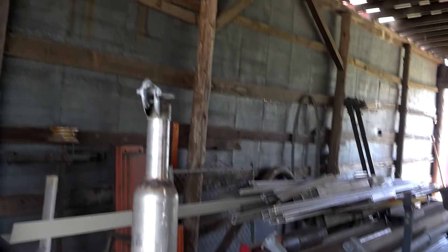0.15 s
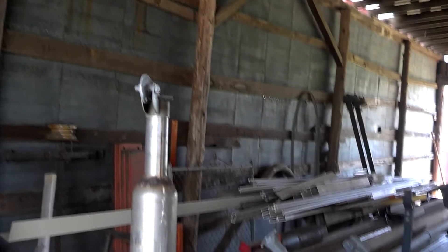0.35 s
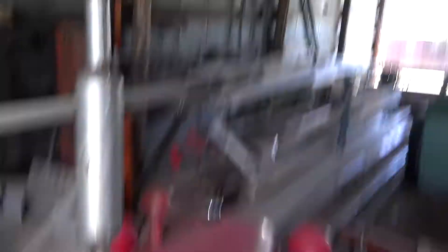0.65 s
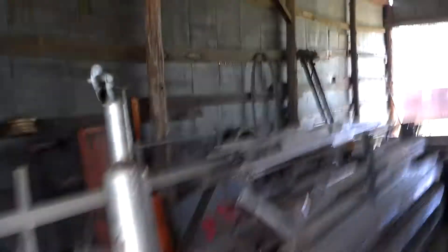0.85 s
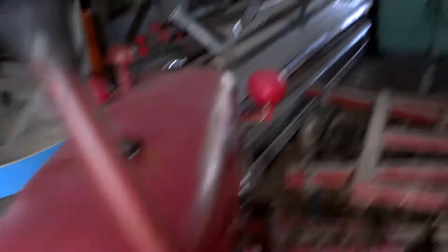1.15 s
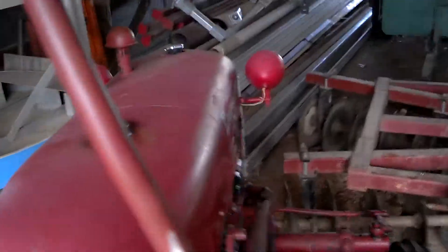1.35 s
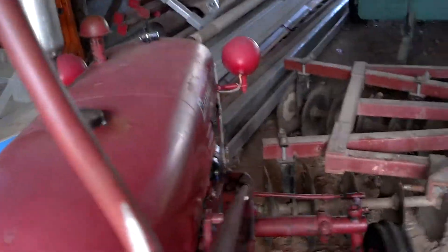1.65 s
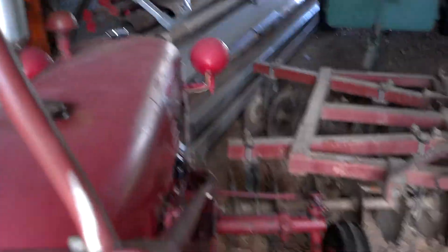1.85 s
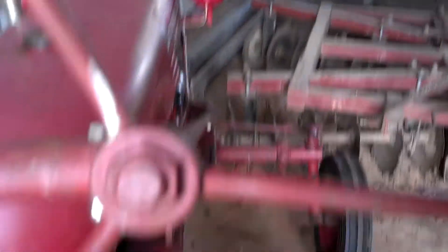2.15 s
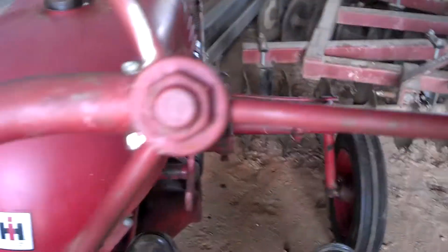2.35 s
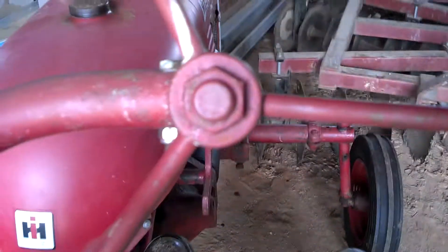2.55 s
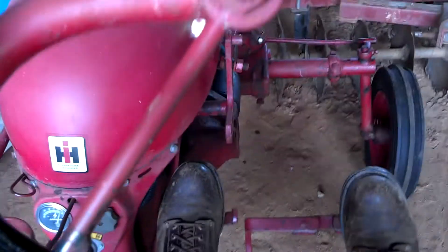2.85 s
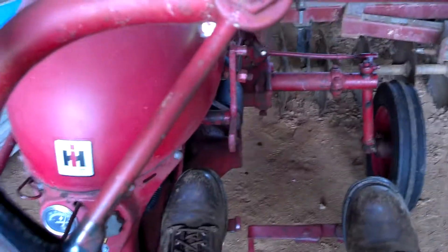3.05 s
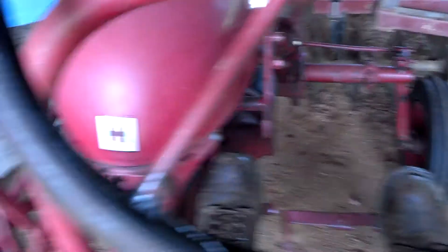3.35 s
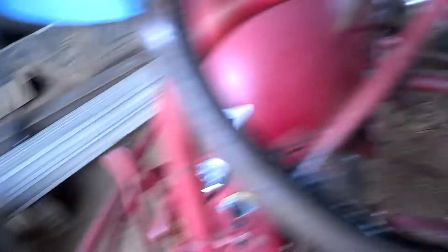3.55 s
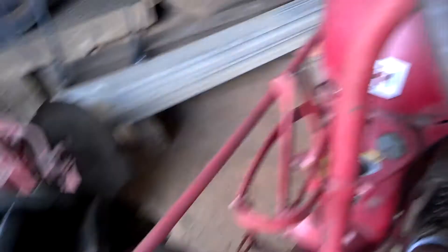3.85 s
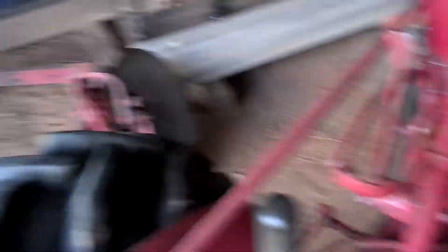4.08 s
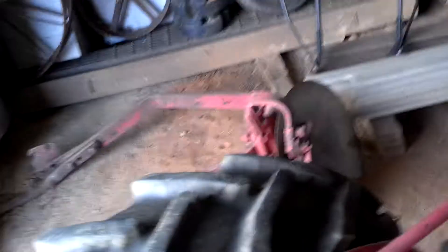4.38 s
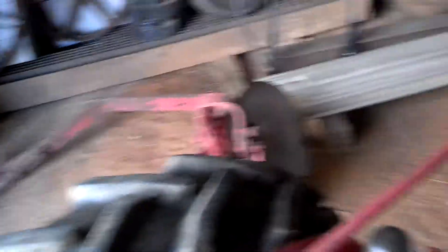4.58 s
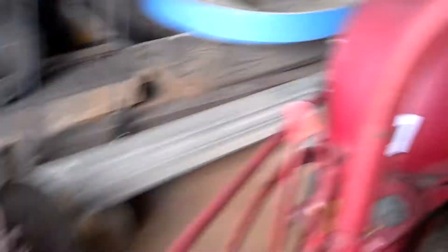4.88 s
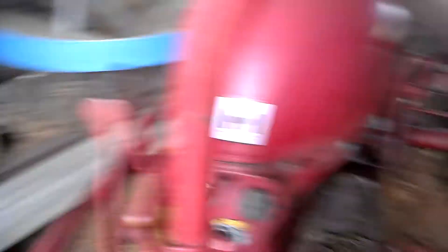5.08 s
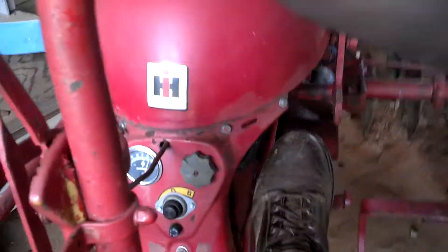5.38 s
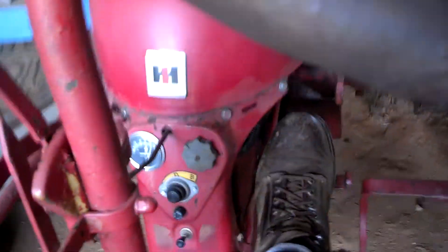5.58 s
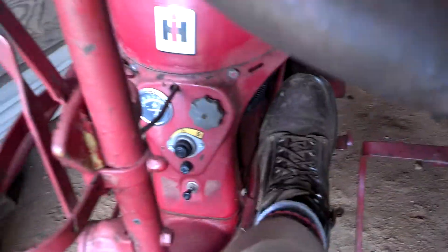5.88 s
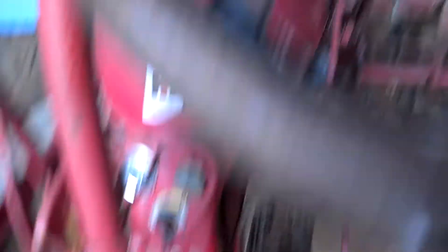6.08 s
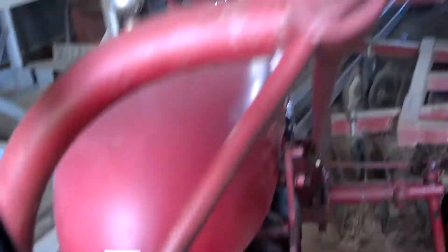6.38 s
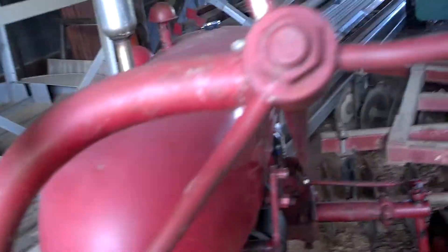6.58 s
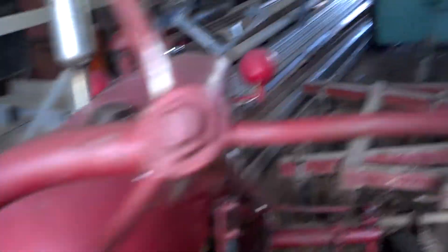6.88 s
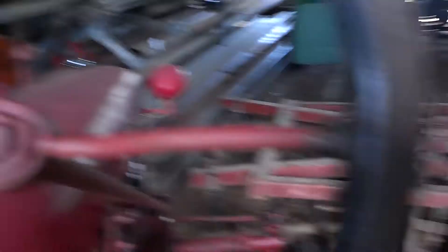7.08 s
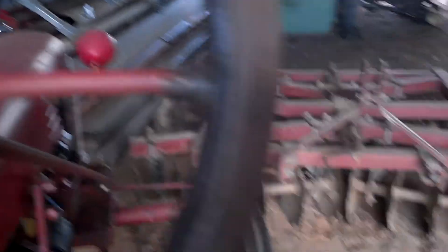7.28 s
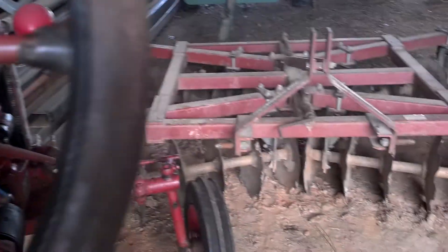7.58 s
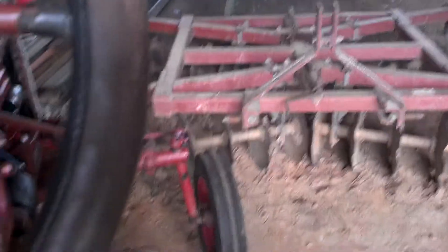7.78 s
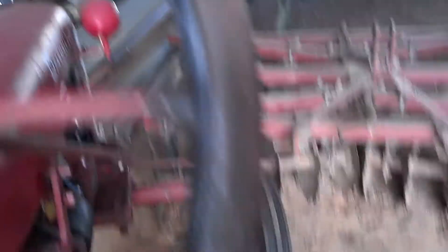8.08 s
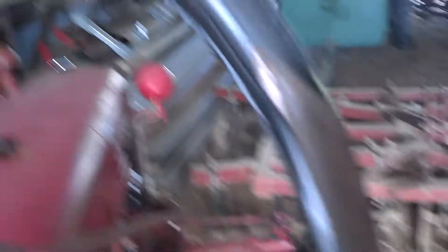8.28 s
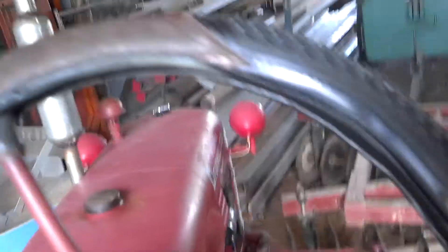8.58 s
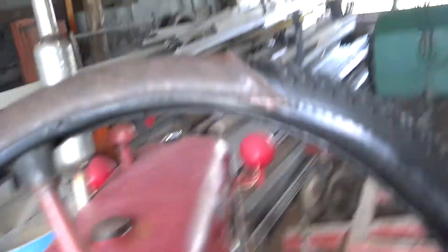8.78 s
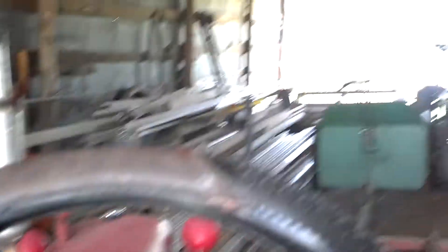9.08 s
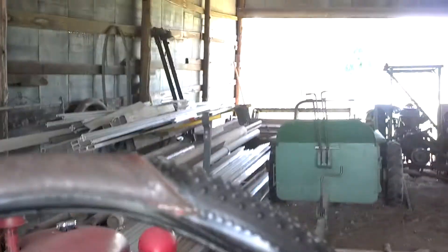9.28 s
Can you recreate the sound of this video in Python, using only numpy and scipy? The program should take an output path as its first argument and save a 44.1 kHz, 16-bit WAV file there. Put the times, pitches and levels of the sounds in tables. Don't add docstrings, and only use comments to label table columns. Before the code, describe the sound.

A steady, rough engine drone with rapid firing pulses, rhythmic valve clatter and faint belt squeaks. At first it is muffled by a hand, with buzzing plastic and several thuds, then it opens up brighter. Light metallic tinkles from the exhaust cap continue. One sharp knock just before five seconds ducks the sound, which creeps back. The tone shifts as the camera turns inside the shed.

```python
import sys
import numpy as np
from scipy import signal
from scipy.fft import rfft, irfft
from scipy.io import wavfile
from scipy.ndimage import uniform_filter1d, map_coordinates

SR = 44100
rng = np.random.default_rng(int(sys.argv[2]) if len(sys.argv) > 2 else 0)


def nominal_scale(level):
    x = np.asarray(level, float) / 20
    return 10 ** x


def master(y):
    cut = np.clip(np.atleast_2d(y).T, -1, 1)
    pcm = np.round(cut * 32767)
    wavfile.write(sys.argv[1], SR, pcm.astype(np.int16))


N = 416304
TIME, HZ = np.arange(N) / SR, np.fft.rfftfreq(N, 1 / SR) + 1e-3

# (time [s], four times the firing rate [Hz])
ENGINE_SPEED = [
    (.3, 110.1),
    (.9, 109.2),
    (2.1, 109.4),
    (3.8, 110.1),
    (4.45, 110.7),
    (5.7, 111.0),
    (9.44, 111.05),
]


def level(x, db):
    return x * nominal_scale(db) / np.sqrt(np.mean(x ** 2))


def along(table, column):
    table = np.array(table, float)
    return np.interp(np.log(HZ), np.log(table[:, 0]), table[:, column])


def ring(x, hz, width_hz):
    r, w = np.exp(-np.pi * width_hz / SR), 2 * np.pi * hz / SR
    return signal.lfilter([0, r * np.sin(w)], [1, -2 * r * np.cos(w), r * r], x)


def band(x, edges_hz):
    return signal.lfilter(*signal.butter(1, edges_hz, "band", fs=SR), x)


def blows(at, size):
    return np.bincount(np.clip(at.astype(int), 0, N - 1), size, N)


def walk(rate):
    k = int(SR / rate)
    steps = np.repeat(rng.standard_normal(N // k + 1), k)
    return 1.37 * uniform_filter1d(uniform_filter1d(steps, k), k)[:N]


def gain_control():
    # (time [s], depth [dB])
    ducks = [
        (0, 0.5),
        (0.271, 2),
        (0.505, 3),
        (.584, 4.5),
        (.858, 0),
        (1.081, 9),
        (4.784, 13.5),
    ]
    hold_s, recover_db_per_s = .11, 10.5
    s, depth_db = np.transpose(ducks)[:, :, None]
    recovered_db = recover_db_per_s * np.clip(TIME - s - hold_s, 0, None)
    return -np.max((TIME >= s) * np.clip(depth_db - recovered_db, 0, None), axis=0)


def roar(fired, treble_db, puff=1.8, fade=.35, flicker_db=1.2, split_hz=5000):
    # (frequency [Hz], level per Hz [dB])
    colour = [(50, -51), (72, -5), (110, -10), (200, -4.5), (400, -8), (650, -6), (1150, -6.5),
              (1600, -16.5), (2000, -14), (3000, -24), (5000, -28.5), (9500, -41.5), (11300, -43),
              (11800, -32), (15500, -29)]
    cylinder_db = [-8, -8, -12, -14]
    strength = nominal_scale(np.take(cylinder_db, fired.astype(int) % 4))
    gate = 1 + puff * strength * np.exp(-((fired + .8) % 1) / fade)
    gas = level(gate * nominal_scale(flicker_db * walk(14)), 0) * rng.standard_normal(N)
    hiss = nominal_scale(treble_db + .56 * walk(9.1) + .5 * walk(4.2)) * rng.standard_normal(N)
    low = 1 / (1 + (HZ / split_hz) ** 2)
    mixed = rfft(gas) * np.sqrt(low) + rfft(hiss) * np.sqrt(1 - low)
    return irfft(mixed * nominal_scale(along(colour, 1)), N)


def belt(fired, slip_db=4, slips=30, swell_db=1.2, tug_db=7, tug_at=.6, tug_firings=.6):
    # (frequency [Hz], width [Hz], level [dB])
    squeaks = [(3204, 70, 3.5), (3546, 140, 1.5), (3767, 70, 1.5), (4456, 190, 0.5), (3900, 1500, -7.5)]
    cycle = (fired - tug_at) / 4
    strength_db = tug_db * rng.random(N // 4000)[cycle.astype(int) + 1]
    tug = strength_db * 2 * np.exp(-(cycle % 1) * 4 / tug_firings)
    swell = swell_db * walk(3.8) + uniform_filter1d(tug, size=300)
    out = 0
    for hz, width, db in squeaks:
        slipping = nominal_scale(slip_db * walk(slips) + swell) * rng.standard_normal(N)
        out = out + level(ring(slipping, hz, width), db)
    return out


def rain_cap(duck_db, chatter_db=-56, hold_s=.07, share_db=2.5, rough_db=1.2):
    # (frequency [Hz], width [Hz], level [dB])
    lid = [(3690, 40, -7), (4522, 25, 0), (5250, 30, -14), (5510, 25, -14), (5770, 40, -17), (6655, 30, -8),
           (6740, 40, -10), (7750, 30, -20)]
    # (time [s], peak level [dB], level of tones above 6 kHz [dB])
    strikes = [(.003, -36, -20), (0.421, -34, -30), (0.6618, -36, -14), (1.06, -37, -10), (1.839, -37, -19),
               (1.9527, -37, -8), (2.035, -35, 1.5), (2.133, -39, -12), (2.255, -37, -12), (2.458, -36, -7),
               (2.665, -36, 0), (2.9747, -41, -16), (3.242, -38, -6), (3.431, -33, -24), (3.622, -40, -6),
               (3.813, -40, -3), (3.95, -44, -15), (4.13, -38, -11), (4.7142, -43, 1), (4.87, -50, -13),
               (5.2692, -46, -20), (5.69, -44, -13), (5.886, -35.5, -6), (6.29, -40, -13),
               (6.4695, -36, -10), (6.671, -40, -10), (6.9044, -43, 3), (7.0, -40, -18),
               (7.086, -29.5, -13), (7.266, -34, -11), (7.4964, -37, -17), (7.575, -38, -21),
               (7.663, -36, -16), (7.867, -36, -8), (8.012, -47, -14), (8.1815, -50, -18),
               (8.411, -41, -15), (8.556, -47, -15), (8.73, -36, -7), (9.07, -36, -14), (9.226, -39, -17),
               (9.399, -36, -9)]
    s, peak_db, upper_db = np.transpose(strikes)
    luck = rng.standard_normal((len(s), len(lid)))
    held = uniform_filter1d(blows((s + hold_s / 2) * SR, np.ones(len(s))), int(hold_s * SR)) > 0
    held = np.roll(uniform_filter1d(1. * held, size=700), shift=300)
    out = 0
    for k, (hz, width, db) in enumerate(lid):
        extra_db = upper_db + 7.5 if hz > 6000 else share_db * luck[:, k] * (db < 0)
        size = nominal_scale(peak_db - 3 + db + extra_db)
        struck = ring(blows(s * SR, size), hz, width / 3) * held * nominal_scale(rough_db * walk(70))
        trembling = nominal_scale(9.1 * walk(22)) * rng.standard_normal(N)
        chatter = level(ring(trembling, hz, .45 * width), chatter_db + .5 * db)
        out = out + struck + nominal_scale(duck_db) * chatter
    return out


def buzz(fired, rate_hz=1500, cut_hz=170, driven_db=-6, wander=.003):
    # (frequency [Hz], width [Hz], level [dB])
    rattle = [(187, 11, -3), (248, 9.1, -2), (342, 12, -5), (442, 24, 5.5), (700, 30, 0.5), (912, 36, 5.5),
              (1040, 80, 4.5)]
    # (time [s], level [dB])
    pressed = [
        (0, -31),
        (.38, -29),
        (.42, -26.5),
        (.51, -35.5),
        (.58, -34),
    ]
    strikes = (rng.random(N) < rate_hz / SR) * rng.standard_normal(N) * nominal_scale(2 * rng.standard_normal(N))
    shake = (.39 + np.exp(-((fired + .031) % 1) / .45)) * strikes
    out = 0
    for hz, width, db in rattle:
        multiple = round(8 * hz / ENGINE_SPEED[0][1]) / 2
        turn = multiple * (fired + wander * walk(24)) + rng.random()
        driven = nominal_scale(db + driven_db + 2 * walk(12.3)) * np.sin(2 * np.pi * turn)
        out = out + nominal_scale(db) * level(ring(shake, hz, width), 0) + driven
    out = signal.lfilter(*signal.butter(2, cut_hz, "high", fs=SR), out)
    s, db = np.transpose(pressed)
    return out * nominal_scale(np.interp(TIME, s, db, right=-99) - 5.5)


def twist(shake, twist_db=6.5, twist_hz=(110, 271)):
    return nominal_scale(twist_db) * band(shake, twist_hz) * np.array([[-1.1], [.9]])


def fingers(push_s=(.0007, .0004, .00014, .00012), snap_db=-12):
    # (frequency [Hz], width [Hz])
    shell = [(430, 104), (1120, 570), (1800, 810), (4300, 480)]
    # (time [s], low tone [dB], high tone
    # [dB], nail tick [dB], low tone at left port against right [-2..1])
    knocks = [(.2928, -10, -1, -36, -0.9), (0.407, -10, -22, -38, .3), (0.4372, -5, -20, -40, .3),
              (0.4468, -8, -13, -38, .3), (0.4693, -8, 3, -24, -0.6), (0.5078, -1, 3.5, -22, -0.45),
              (0.5832, 1.5, -12, -40, -.1), (0.8576, -4, -20, -18, .3), (.8845, -2.5, -14, -44, -.3),
              (1.0171, -12, -26, -40, -.3), (1.0933, -27, -16, -30, -1), (4.747, -11, -3.5, -30, .3),
              (2.861, -32, -13, -34, .3), (3.411, -27, -15, -34, .3), (7.95, -24, -9, -30, .3)]
    # (time [s], frequency [Hz], width [Hz], left swing [-2..2], right swing [-2..2])
    hard_raps = [(.85785, 1000, 300, -.35, 0), (.8582, 1100, 300, 0, .14), (1.05735, 1300, 500, .8, 0),
                 (1.05775, 1350, 900, 0, -1), (1.0577, 2150, 600, -.3, -.3), (1.0582, 1050, 250, .22, .3),
                 (1.0589, 1080, 250, .25, .3), (1.0575, 520, 250, -.15, -.2), (1.0773, 1150, 500, 0, .5),
                 (1.0781, 700, 350, .9, 0), (1.0809, 450, 110, 0, .16), (4.7838, 900, 380, 0, -1.35),
                 (4.7842, 450, 200, .2, .3), (4.78395, 1750, 900, -.6, -.5), (4.78415, 1100, 550, .9, 0),
                 (4.784, 4300, 1100, -.3, -.3)]
    s, low_db, high_db, tick_db, left = np.transpose(knocks)

    def knock(size, k):
        push = uniform_filter1d(blows(s * SR, -size), int(push_s[k] * SR) + 1)
        return ring(push, *shell[k])

    sharp = knock(nominal_scale(high_db), 1) + knock(nominal_scale(tick_db), 2) + knock(nominal_scale(tick_db + snap_db), 3)
    left_port = knock(left * nominal_scale(low_db), 0) + .8 * np.roll(sharp, shift=3)
    right_port = knock(nominal_scale(low_db), 0) + sharp
    raps = 0
    for rap_s, hz, width, *swing in hard_raps:
        raps = raps + np.outer(swing, ring(blows(np.array([rap_s * SR]), [1.]), hz, width))
    raps = signal.lfilter(*signal.butter(1, 150, "high", fs=SR), raps)
    both = np.array([left_port, right_port])
    both = signal.lfilter(*signal.butter(2, [280, 5500], "band", fs=SR), both)
    return signal.lfilter(*signal.butter(4, 5300, fs=SR), both + raps)


def tappet(fired, cover_hz=1070, width_hz=30, scatter_db=1, blow_db=7, lean_db=12):
    lean_s = (4.75, 5.05, 5.9, 7.5)
    first = np.interp(6.012, TIME, fired) % 4
    at = np.interp(np.arange(first, fired[-1], 4), fired, np.arange(N))
    lean = np.interp(at / SR, lean_s, [0, 1, 1, 0])
    size = nominal_scale(blow_db + lean_db * lean + scatter_db * rng.standard_normal(len(at)))
    return ring(blows(at, size), cover_hz, width_hz)


def valves(fired, count=110, scatter_db=3, spread_db=1.5, slack=.005, bunch_db=3, bunch_at=.3):
    # (frequency [Hz], width [Hz], level [dB])
    block = [(159, 96, -5.5), (299.6, 55, -1.5), (353, 136, -3), (750, 255, -1), (1072, 150, 2.5),
             (2050, 1300, -5), (3280, 1700, -20)]
    angle = rng.random(count) * 4
    size = nominal_scale(spread_db * rng.standard_normal(count)) * rng.choice([-1, 1], count)
    size = size * nominal_scale(bunch_db * np.cos(2 * np.pi * (angle - bunch_at)))
    chance = rng.standard_normal((int(fired[-1] / 4) + 1, count, 2))
    when = 4 * np.arange(len(chance))[:, None] + angle + slack * chance[..., 0]
    at = np.interp(when.ravel(), fired, np.arange(N))
    hits = blows(at, (size * nominal_scale(scatter_db * chance[..., 1])).ravel())
    return sum((-1) ** k * nominal_scale(db) * ring(hits, hz, width) for k, (hz, width, db) in enumerate(block))


def thumps(fired, place=.3, scatter_db=2, slack=.025):
    blow_db = [-9, 0, -2, 0]
    # (frequency [Hz], width [Hz], level [dB])
    thuds = [(365, 80, 8.5), (680, 200, 7), (1050, 220, 9)]
    count = np.arange(int(fired[-1]))
    chance = rng.standard_normal((len(count), 2 + len(thuds)))
    at = np.interp(count + place + slack * chance[:, 0], fired, np.arange(N))
    size_db = np.take(blow_db, count % 4) + scatter_db * chance[:, 1]
    out = 0
    for k, (hz, width, db) in enumerate(thuds):
        out = out + ring(blows(at, nominal_scale(db + size_db + scatter_db * chance[:, 2 + k])), hz, width)
    return out


def exhaust(fired, flutter_db=.7, wobble=.006, lash=.013):
    # (multiple of firing rate [-], level [dB])
    tones = [(2, -13), (3, -2), (3.5, -17), (4, 3.5), (4.5, -12), (5, -3), (5.5, -12), (5.75, -10),
             (6.5, -11), (7, -6.5), (7.5, -14), (8, -13), (9.5, -14), (10, -8), (10.5, -11), (11, -12),
             (11.5, -9), (12, -12), (12.5, -8), (13, -8), (13.5, -5), (14, -8), (15.5, -5), (16, -6)]
    # (multiple of firing rate [-], level [dB])
    gears = [(10.82, 2), (20.5, -12), (28.5, -7.5), (34.4, -5.5)]
    # (time [s], level [dB])
    grip = [
        (.6, -13),
        (1, -6),
        (1.3, 0),
    ]
    pulse_at = .52
    pulse_turn, uneven_turn = .8, .99
    crank = fired + wobble * walk(6)
    out = 0
    for multiple, db in tones:
        turn = multiple * (crank + pulse_at) + (uneven_turn if multiple % 1 else pulse_turn)
        out = out + nominal_scale(db + flutter_db * walk(3.31)) * np.sin(2 * np.pi * turn)
    grip_db = np.interp(TIME, *np.transpose(grip))
    for multiple, db in gears:
        turn = multiple * (crank + lash * walk(9)) + rng.random()
        out = out + nominal_scale(db + grip_db + 3.36 * flutter_db * walk(15)) * np.sin(2 * np.pi * turn)
    return out


def reflections(body, tilt, boom_db):
    # (time [s], cancelled frequency [Hz], share [0-1])
    fender = [(2.2, 470, 0), (2.5, 465, .45), (3, 490, .4), (3.4, 600, .3), (3.8, 760, .55),
              (4.3, 780, .45), (4.6, 740, 0), (8, 460, 0), (8.3, 440, .45), (8.6, 440, .35), (8.9, 440, 0)]
    floor_share, floor_peak_hz, tank_db = .35, (306, 575), -11
    boom = band(body, [340, 580])
    body = body + (nominal_scale(tank_db * tilt ** 2) - 1) * band(body, (770, 896))
    late = np.arange(N) - SR / np.interp(tilt, [0, 1], floor_peak_hz)
    floor = map_coordinates(boom, [late], order=1)
    body = body + (nominal_scale(boom_db) - 1) * boom + floor_share * nominal_scale(boom_db) * floor
    s, hz, share = np.transpose(fender)
    late = np.arange(N) - SR / 2 / np.interp(TIME, s, hz)
    return body + np.interp(TIME, s, share) * map_coordinates(band(body, [400, 850]), [late], order=1)


def two_ports(right, echo, handling):
    # (frequency [Hz], level [dB], extra delay [radians], unrelated share [0-1])
    pair = [(40, 0, .9, .95), (65, -7, .8, .6), (110, -5.2, .23, .5), (190, -4.4, -.66, .5),
            (300, -6, -1.3, .45), (440, -2.3, -1.8, .45), (600, 0, -1.6, .6), (800, -2.2, -1.8, .55),
            (1050, -2.4, -2.45, .4), (1350, -.5, -3.09, .3), (1700, -1.5, -3, .6), (2100, -3.2, -2.9, .55),
            (3000, 0, -3.14, .45), (16000, -.5, -3.14, .47)]
    lag_samples = 16
    right, echo = rfft(right), rfft(echo)
    behind = 2 * np.pi * HZ * lag_samples / SR + along(pair, 2)
    share = along(pair, 3)
    left = np.sqrt(1 - share ** 2) * np.exp(-1j * behind) * right + share * echo
    left, right = np.array([nominal_scale(along(pair, 1)) * left, right]) + rfft(handling)
    keep_mid = np.where(HZ > 1300, np.clip(np.abs(np.cos(behind / 2)) / .27, 0, 1) ** 2, 1)
    keep_side = np.where(HZ > 1300, np.clip(np.abs(np.sin(behind / 2)) / .27, 0, 1) ** 2, 1)
    mid, side = (left + right) / 2 * keep_mid, (left - right) / 2 * keep_side
    return irfft(np.array([mid + side, mid - side]), N)


def scene():
    # (time [s], tilt towards the floor [0-1], exhaust drone at that spot [dB])
    camera = [(0, 0.9, -1.5), (.9, 0.33, -1), (1.3, 0.07, -3), (2.1, 0, 0), (2.4, 0.38, -0.5),
              (2.9, 0.24, 1.2), (3.5, 0.18, 3.5), (4.2, 0.67, 0.5), (4.8, 0.64, 3), (5.4, 0.84, 1.5),
              (5.9, 0.78, 1.5), (6.4, 0.48, 0), (7, 0.39, 1.3), (8.2, 0.46, 0.5), (8.8, 0.57, 2),
              (9.44, 0.43, 0.5)]
    # (start [s], end [s])
    palm_s = [
        (-.1, 0.63),
        (.93, 1.05),
    ]
    s, tilt, drone_db = np.transpose(camera)
    tilt, drone_db = np.interp(TIME, s, tilt), np.interp(TIME, s, drone_db)
    boom_db, treble_db, block_db = -4 + 11 * tilt, 2 - 6 * tilt, -.48 - .78 * tilt
    palm = uniform_filter1d(1. * sum((TIME > on) & (TIME < off) for on, off in palm_s), size=4000)
    doorway_db = np.interp(TIME, (5.3, 10), [0, 4])
    treble_db = treble_db - 19 * palm + doorway_db
    duck_db = gain_control()
    gain_db = -34 + duck_db
    fired = np.cumsum(np.interp(TIME, *np.transpose(ENGINE_SPEED))) / (4 * SR)

    body = level(roar(fired, treble_db), 7.52) + level(valves(fired), 1.4) + tappet(fired) + thumps(fired)
    body = body + nominal_scale(.17 * treble_db) * level(belt(fired), -10.5)
    body = reflections(body, tilt, boom_db)
    drone = nominal_scale(drone_db) * level(exhaust(fired), 3)
    engine = nominal_scale(gain_db) * (drone + nominal_scale(block_db) * body)
    shake = buzz(fired)
    echo = nominal_scale(gain_db + block_db) * level(roar(fired, treble_db), 7.96)
    return two_ports(engine + rain_cap(duck_db - 7.5) + shake, echo, fingers() + twist(shake))


def top_cut(x):
    return signal.sosfilt(signal.butter(12, 16950, fs=SR, output="sos"), x)


def record(dry):
    # (frequency [Hz], level [dB])
    bass = [(30, 2), (42, -10), (72, -11), (88, 0)]
    cut = signal.sosfilt(signal.butter(3, 60, "high", fs=SR, output="sos"), dry)
    dip = 1 - .21 * np.exp(-((HZ - 10450) / 200) ** 2)
    response = dip * nominal_scale(along(bass, 1)) * (HZ < 15730)
    mix = irfft(rfft(np.clip(cut, -1, 1)) * response, N)
    return top_cut(mix)


dry = scene()
out = record(dry)
master(out)
```